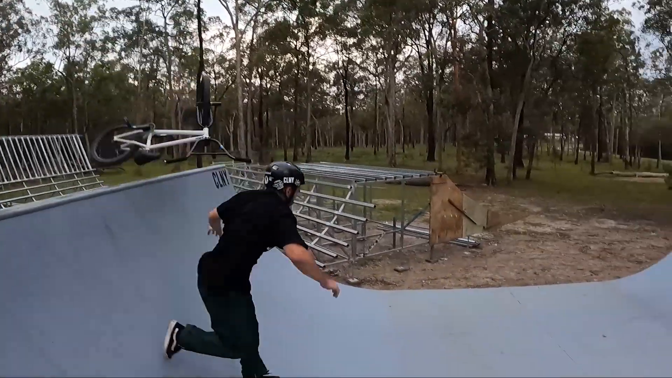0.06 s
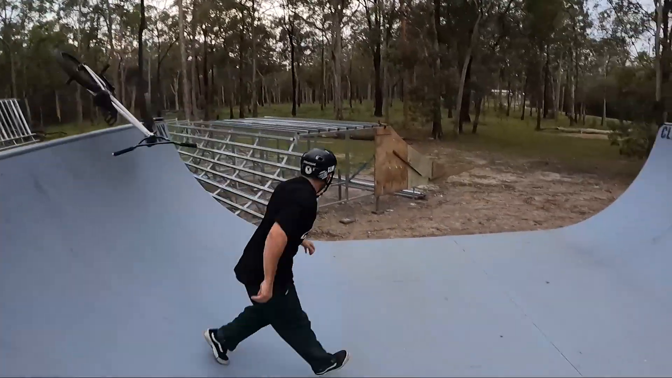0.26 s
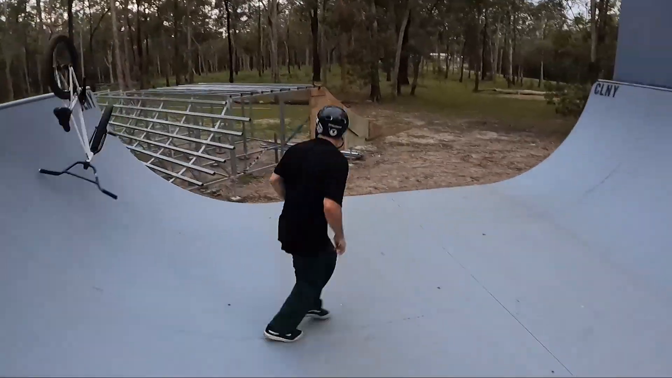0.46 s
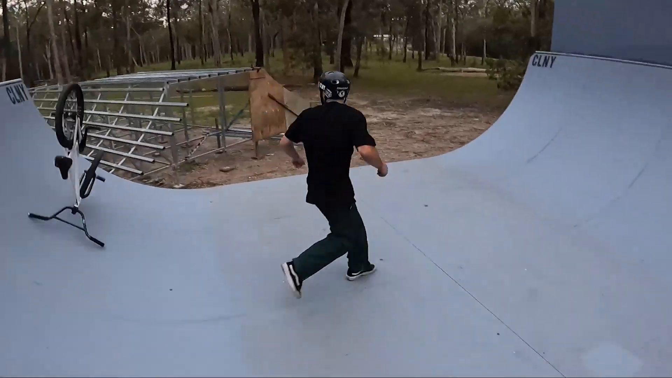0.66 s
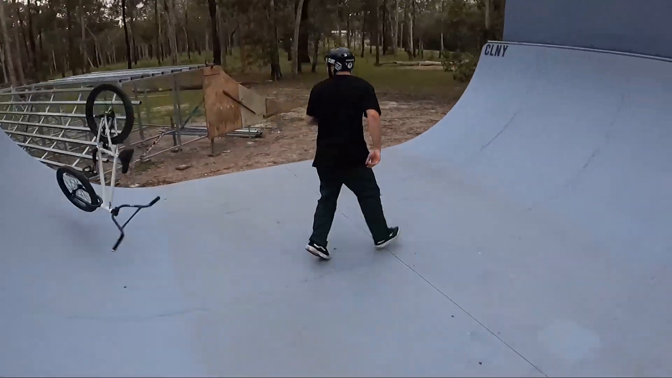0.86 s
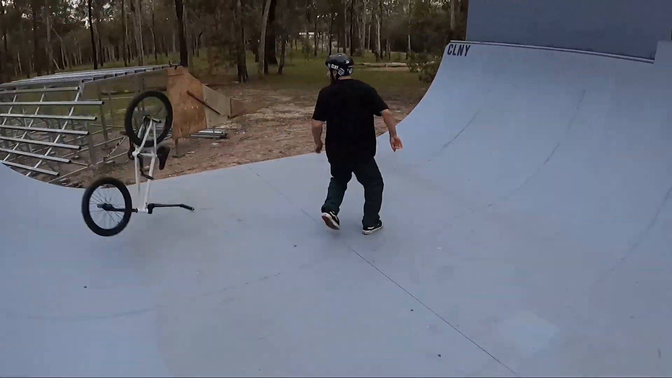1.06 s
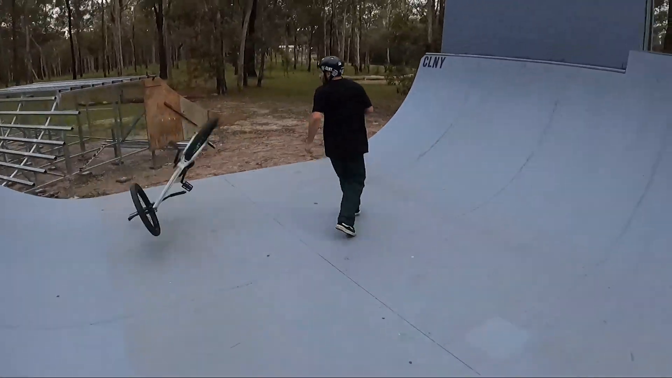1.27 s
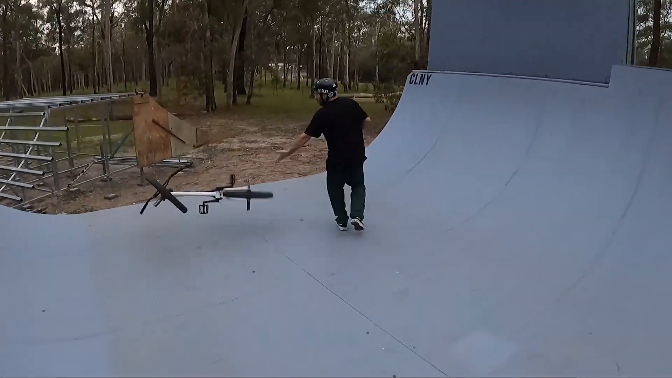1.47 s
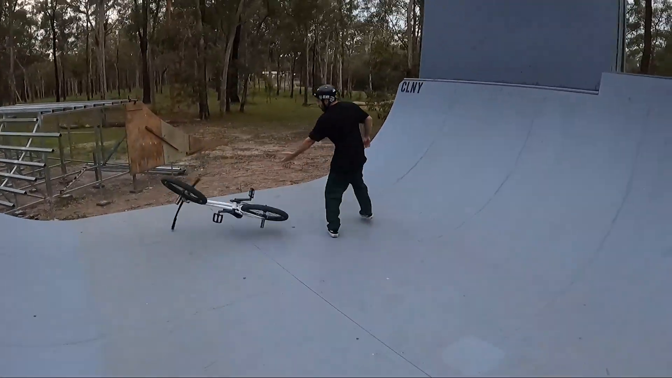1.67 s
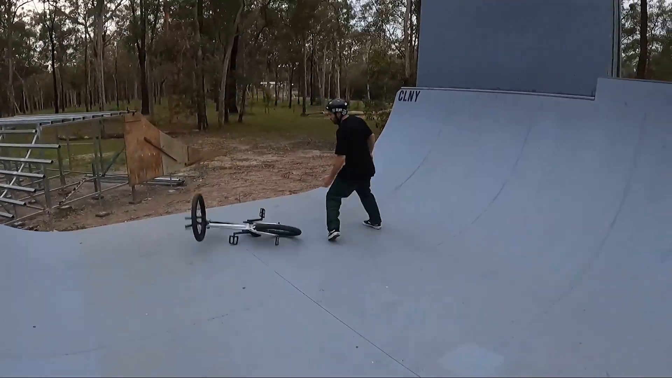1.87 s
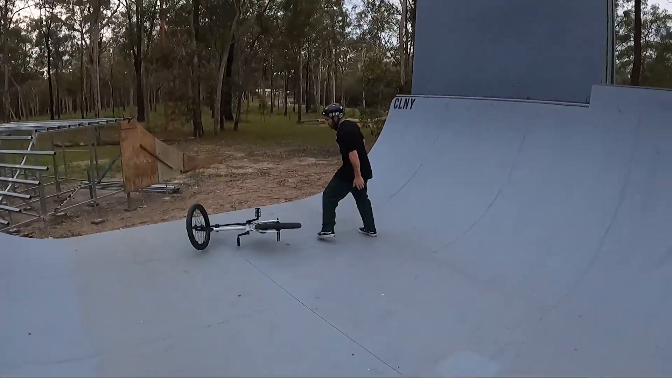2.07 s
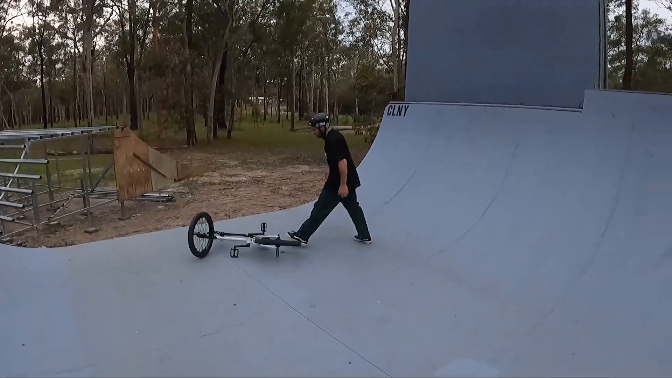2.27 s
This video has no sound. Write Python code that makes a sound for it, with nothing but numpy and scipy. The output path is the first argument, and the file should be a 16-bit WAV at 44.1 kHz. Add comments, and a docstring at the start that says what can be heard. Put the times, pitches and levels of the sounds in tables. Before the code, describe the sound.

Close, nearly mono outdoor pickup of a bike tumbling on a hollow ramp: first thuds, a brief shoe squeak, clustered cracks and booms, gritty scraping, then fading clatter, with soft air hiss and insect whine.

```python
"""A riderless bike tumbles down a hollow wooden ramp while its rider's shoes slap and squeak on the deck.
Throughout, cicadas whine in the trees, air hisses and low rumble shakes the microphone under a scraping slide.
A faint squeak leads into the first blows: noise bursts crack, echo off the facing slope and boom in the panels.
From half way the steel frame rings faintly, sine pips whistle softly, and the last blows grow weaker."""
import sys
import numpy as np
from scipy import signal
from scipy.fft import rfft, irfft
from scipy.io import wavfile
from scipy.ndimage import uniform_filter1d

SR = 44100
rng = np.random.default_rng(int(sys.argv[2]) if len(sys.argv) > 2 else 0)


def store_pcm(level_fs):
    """Save levels as 16-bit WAV."""
    pcm = np.round(np.clip(level_fs, -1, 1) * 32767).astype(np.int16)
    wavfile.write(sys.argv[1], SR, np.atleast_2d(pcm).T)


N = 101430  # samples, 2.3 s

# Blows of bike and shoes on the ramp, and some of their echoes off the facing slope.
# Each row: start in seconds, levels of knock, thump, boom and snap in dB,
# snap pitch, boom centre and thump centre in Hz, crack length in seconds, knock tilt in dB per octave,
# rattle in dB relative to the crack.
BLOWS = [(0.062, -39.5, -47, -46, -42, 6700, 285, 138, 0.0031, -1.5, -6),
         (0.189, -35.5, -21, -25.5, -48, 7100, 288, 88, 0.0019, -9, -3),
         (0.214, -13.5, -9, -4.5, -30, 4700, 272.3, 174, 0.0036, -0.6, -22),
         (0.244, -65, -20, -52, -41, 6820, 245, 98, 0.0041, -0.3, -11),
         (0.42, -27.5, -20.5, -29, -45, 7500, 296, 224, 0.0022, -15, -27),
         (0.447, -24, -17.5, -38, -48, 4630, 242, 78.6, 0.0021, -1.3, -6.5),
         (0.452, -34, -40, -27.5, -27.5, 5700, 321, 88.8, 0.0044, 7, -8),
         (0.592, -16, -22, -14, -22, 5040, 328, 157, 0.0031, -0.1, -12),
         (0.641, -7, -17, -3.5, -9.5, 6500, 334, 207, 0.0037, 1.5, -13.5),
         (0.664, -8.5, -14.5, -32, -5, 7300, 360, 133, 0.0038, 0.4, -8.5),
         (0.671, -16.5, -22, -30, -8.5, 6900, 365, 126, 0.0038, 1, -11.5),
         (0.707, -19.5, -14.5, -13, -13.5, 7640, 315, 80.7, 0.0047, 1.3, -20),
         (0.713, -19, -19, -35, -18.5, 6950, 350, 134, 0.0056, -0.3, -7),
         (0.743, -27, -42, -55, -48, 4570, 358, 221, 0.0059, -4, -15),
         (0.794, -18.5, -19.5, -26, -8, 7040, 425, 162, 0.0034, -0.2, 2),
         (0.799, -14.5, -20, -7, -19.5, 7300, 342, 221, 0.0041, 0.6, -3.5),
         (0.819, -28, -23, -15, -31, 6950, 348, 224, 0.005, -1.2, 2.5),
         (0.835, -25, -32, -44, -20, 6920, 360, 134, 0.0053, -1.5, 2),
         (0.843, -25, -23, -19.5, -21, 6620, 336, 80.4, 0.0035, 0, -4),
         (0.869, -28, -26, -20.5, -34, 6700, 287, 132, 0.0032, 0, -11),
         (1.057, -14, -16.5, -13, -12.5, 6200, 308, 169, 0.0015, -2.9, -3.5),
         (1.096, -25.5, -20.5, -49, -30, 3760, 307, 176, 0.0043, -3, -24),
         (1.208, -9.5, -16.5, -13, -29, 4370, 358, 206, 0.0046, 1.85, -5),
         (1.259, -10.5, -12.5, -9.5, -6.5, 5850, 380, 163, 0.0044, -1.7, -9),
         (1.291, -4, -12, -7.5, 0.5, 6040, 387, 167.5, 0.0026, 1, -9.5),
         (1.335, -19.5, -23, -30, -38, 7260, 433, 154, 0.0072, 1.5, -2),
         (1.349, -16, -17.5, -17.5, -43, 3800, 282, 178, 0.004, 0, -11),
         (1.658, -18.5, -17.5, -1, -6.5, 6360, 392, 229, 0.0056, -6, -20.5),
         (1.663, -4.5, -7.5, -37, -37, 4870, 380, 152, 0.005, -3.1, -13),
         (1.762, -12, -21, -14.5, -39, 3440, 387, 227, 0.0028, -2.83, -9.5),
         (1.767, -20.5, -23, -22, -27, 5330, 286, 82, 0.0057, -6.5, -23),
         (1.779, -18, -14.5, -19.5, -41, 3570, 279, 84, 0.0027, -6.7, -11),
         (1.969, -8.5, -21, -18, -10.5, 4500, 366, 83.4, 0.0019, -1.3, -8.5),
         (1.982, -15.5, -15, -32, -15.5, 5400, 246, 163, 0.0035, -2.4, -3),
         (1.993, -15, -23, -15.5, -11, 5200, 307, 219, 0.0018, -2.8, -8),
         (1.999, -14, -16.5, -46, -48, 5360, 313, 94, 0.0063, 0, -10),
         (2.183, -25.5, -50, -27, -17.5, 5500, 368, 81.6, 0.0039, -0.3, -9.5),
         (2.191, -32, -31, -26.5, -40, 5260, 358, 155, 0.0035, 0.3, 1.5),
         (2.241, -32.5, -32, -33, -31, 3860, 370, 95, 0.0014, -1.5, -2.5),
         (2.253, -22, -25, -53, -23, 4640, 435, 197, 0.0029, -2, -4.5),
         (2.264, -35.5, -42, -31, -46, 4840, 248, 180, 0.0031, 0.2, 2)]


def amp(db):
    """Turns dB into gain."""
    return 10 ** (np.asarray(db) / 20)


def evened(x):
    """Scales a sound to unit RMS."""
    return x / np.sqrt(np.mean(x ** 2) + 1e-20)


def steadied(x):
    """Low noise with its gusts held back against its lulls, which leaves it a few dB below unit RMS."""
    unit = evened(x)
    return unit / np.sqrt(uniform_filter1d(unit ** 2, size=3000) + 0.94)


def curve(points, count=1):
    """A level curve, from the dB in column count, as gain for every sample."""
    s, db = np.transpose(points)[[0, count]]
    return amp(np.interp(np.arange(N) / SR, s, db))


def colour(x, points):
    """Filters by a spectrum given as (Hz, dB), joined along a log frequency axis."""
    f, db = np.transpose(points)
    hz = np.fft.rfftfreq(len(x), 1 / SR)
    gain = amp(np.interp(np.log(hz + 1), np.log(f + 1), db))
    return irfft(rfft(x) * gain, len(x))


def add(mix, s, sound):
    """Lays a sound into the mix at s seconds, cut off at the end."""
    part = mix[round(s * SR):][:len(sound)]
    part += sound[:len(part)]


def band(x, hz, width_hz):
    """A two-pole resonance."""
    r = np.exp(-np.pi * width_hz / SR)
    return signal.lfilter([1, 0, -1], [1, -2 * r * np.cos(2 * np.pi * hz / SR), r * r], x)


def nearness(modes, hz, reach_oct):
    """Level in dB by which each mode is driven: 6 dB down at reach_oct octaves from hz."""
    return -6 * (np.log2(np.array(modes)[:, :1] / hz) / reach_oct) ** 2


def ring(modes, extra_db, phases, t, rise_s):
    """Dying modes that swell in over rise_s, scaled by their summed starting power."""
    hz, db, t60 = np.transpose(modes)[:, :, None]
    tones = amp(db + extra_db - 60 * t / t60) * np.sin(2 * np.pi * (hz * t + phases))
    swell = 1 - np.exp(-t / rise_s)
    return tones.sum(0) * swell / np.sqrt(np.sum(amp(2 * (db + extra_db))) / 2)


def air(noise):
    """Steady hiss of the open air: coloured noise."""
    # Spectrum of the air. Each row: frequency in Hz, level in dB per Hz.
    air_colour = [(90, -10), (150, 10), (800, 0), (1500, 1.5), (5000, -6), (9000, -9), (14800, -21),
                  (16300, -18)]
    return amp(-59.5) * evened(colour(noise, air_colour))


def cicadas(noise, drift):
    """Cicadas in the trees: a narrow noise band pulsing at an unsteady rate."""
    # Loudness of the cicadas. Each row: time in seconds, level in dB.
    cicada_level = [(0, -54.5), (.6, -55), (1.2, -57), (1.9, -57), (2.3, -58)]
    pitch_hz, width_hz, mean_pulses_hz = 6950, 1300, 160  # width of each of two passes
    pulse_hz = mean_pulses_hz * (1 + 0.6 * evened(uniform_filter1d(drift, size=900)))
    pulses = 1 + 0.5 * np.sin(2 * np.pi * np.cumsum(pulse_hz) / SR)
    whine = band(band(noise, pitch_hz, width_hz), pitch_hz, width_hz)
    return curve(cicada_level) * evened(pulses * whine)


def rumble_and_drone(rumble_noise, drone_noise):
    """Low rumble shaking the microphone and a drone of the deck: two dark noises that swell and sink."""
    # Loudness before steadying. Each row: time in seconds, rumble in dB, deck drone in dB.
    low_level = [(0.0, -32.5, -33), (0.13, -24.5, -45), (0.17, -28.5, -42), (0.28, -24, -30.5),
                 (0.36, -40, -24), (0.52, -25.5, -39.5), (0.58, -31, -33.5), (0.74, -59.5, -32),
                 (0.81, -36, -46), (0.86, -23.5, -40), (1.05, -32, -36), (1.25, -29, -38), (1.29, -20, -52),
                 (1.4, -25, -39), (1.43, -25, -36.5), (1.63, -33.5, -49), (1.67, -18, -63),
                 (1.78, -16.5, -32), (1.8, -39, -25), (1.94, -29.5, -41), (2.0, -27, -24.5),
                 (2.3, -37, -37)]
    # Spectrum of the rumble. Each row: frequency in Hz, level in dB per Hz.
    rumble_colour = [(10, -4.5), (28, 6.5), (60, -9), (90, -16.5), (200, -46), (500, -86), (2000, -90)]
    # Spectrum of the deck drone. Each row: frequency in Hz, level in dB per Hz.
    drone_colour = [(30, -29), (70, 7.5), (110, 2.5), (200, -5.5), (330, -18), (500, -22), (2000, -72)]
    rumble = curve(low_level) * steadied(colour(rumble_noise, rumble_colour))
    drone = curve(low_level, count=2) * steadied(colour(drone_noise, drone_colour))
    return rumble + drone


def pips():
    """A faint whistle, perhaps a far bird: short soft sine notes."""
    # Notes of the whistle. Each row: start in seconds, length in seconds, level in dB, pitch in Hz.
    notes = [(1.45, .032, -51, 2121), (1.488, .03, -52, 2121), (1.525, .035, -50, 2121),
             (1.568, .042, -50, 2121), (1.628, .03, -52, 2121)]
    out = np.zeros(N)
    for s, length, db, hz in notes:
        t = np.arange(0, length, 1 / SR)
        swell = np.sqrt(abs(np.sin(np.pi * t / length)))
        add(out, s, amp(db) * swell * np.sin(2 * np.pi * hz * t))
    return out


def slide(scrape_noise, fizz_noise, roughness):
    """Gritty sliding of the bike: roughened noise as a scrape, with a treble fizz on top."""
    # Loudness of the slide. Each row: time in seconds, scrape in dB, treble fizz in dB.
    slide_level = [(0.0, -54, -65), (0.27, -79, -62), (0.5, -48.5, -65), (0.63, -54, -58), (0.77, -43, -69),
                   (1.04, -50, -55), (1.16, -51.5, -63), (1.27, -49, -48), (1.34, -37, -45.5),
                   (1.48, -44.5, -66), (1.71, -55, -59), (1.85, -53.5, -54), (2.06, -43, -61),
                   (2.2, -53.5, -65), (2.3, -48, -67)]
    # Spectrum of the sliding. Each row: frequency in Hz, level in dB per Hz.
    slide_colour = [(180, -25), (300, 1), (538, -8), (626, -6), (1120, -13), (1280, -10.5), (1760, -12.5),
                    (4570, -14), (13300, -28.5), (16300, -29)]
    fizz_hz, fizz_width_hz = 13900, 4100
    grit = amp(1.8 * evened(uniform_filter1d(roughness, size=200)))
    scrape = evened(colour(scrape_noise * grit, slide_colour))
    fizz = evened(band(colour(fizz_noise * grit, slide_colour), fizz_hz, fizz_width_hz))
    return curve(slide_level) * scrape + curve(slide_level, count=2) * fizz


def squeaks():
    """Rubber stick-slip of the shoes: a short rising whistle with its octave."""
    # Shoe squeaks. Each row: start in seconds, length in seconds, level in dB, starting pitch in Hz.
    squeak_rows = [(0.026, 0.025, -53, 5000), (0.457, 0.0049, -19, 5050), (0.4684, 0.0062, -28, 5120)]
    glide, octave_db = 0.13, -8.5  # glide: fraction the pitch rises by
    out = np.zeros(N)
    for s, length, db, hz in squeak_rows:
        u = np.arange(0, length, 1 / SR) / length
        turn = 2 * np.pi * np.cumsum(hz * (1 + glide * u)) / SR
        swell = np.sin(np.pi * u ** 0.31)  # peaks early
        add(out, s, amp(db) * swell * (np.sin(turn) + amp(octave_db) * np.sin(2 * turn)))
    return out


def frame():
    """Thin steel tones of the bike frame, their level blurred by loose parts buzzing along."""
    # Modes of the steel frame. Each row: frequency in Hz, level in dB, time to fall 60 dB in seconds.
    steel_modes = [(2121, -6, .6), (4506, -4, .9), (4900, 2, .3), (610, -3, .8), (790, 0, .12)]
    # Strikes on the frame. Each row: start in seconds, level in dB, centre of the driven modes in Hz.
    strikes = [(1.21, -23, 840), (1.293, -43, 2600), (1.66, -39.5, 5340), (1.763, -50, 4400)]
    reach_oct, wobble = 0.26, 0.52  # wobble: RMS fraction of the level
    out, t = np.zeros(N), np.arange(SR) / SR
    for s, db, hz in strikes:
        near_db = nearness(steel_modes, hz, reach_oct)
        throb = 1 + wobble * evened(uniform_filter1d(rng.standard_normal(SR), size=150))
        phases = rng.random((len(steel_modes), 1))
        add(out, s, amp(db) * throb * ring(steel_modes, near_db, phases, t, 0.003))
    return out


def panels():
    """Each row of BLOWS booms in the hollow ramp, most in the panels tuned near the row's own centres."""
    # Low modes of the ramp panels. Each row: frequency in Hz, level in dB, time to fall 60 dB in seconds.
    thump_modes = [(59.4, 5.5, 0.12), (76.8, -11.5, 0.37), (93.4, -2, 0.17), (124.1, -0.5, 0.19),
                   (150.1, -10, 0.31), (166, -5, 0.21), (197.5, 2, 0.1), (214.6, -2, .2)]
    # Higher modes of the ramp panels. Each row: frequency in Hz, level in dB, time to fall 60 dB in seconds.
    boom_modes = [(255, 0.5, .16), (293.2, 5.5, 0.088), (310.4, 0, 0.18), (320.3, 3, 0.19),
                  (346.9, 5, 0.26), (385, 16.5, 0.05), (486, -20, 0.063), (509, 12.5, 0.16)]
    thump_reach_oct, boom_reach_oct, rise_s = 0.39, 0.15, 0.005
    phase_scatter = 0.56  # turns: the modes start within about half a cycle of each other
    out, t = np.zeros(N), np.arange(16384) / SR
    for s, _, thump_db, boom_db, _, _, boom_hz, thump_hz, *_ in BLOWS:
        for modes, db, hz, reach_oct in ((thump_modes, thump_db, thump_hz, thump_reach_oct),
                                         (boom_modes, boom_db, boom_hz, boom_reach_oct)):
            near_db = nearness(modes, hz, reach_oct)
            phases = phase_scatter * rng.random((len(modes), 1))
            add(out, s, amp(db) * ring(modes, near_db, phases, t, rise_s))
    return out


def cracks():
    """Each blow or echo: a noise burst of wooden knock and bright snap, a gritty rattle, and a dull tail."""
    # Spectrum of the wooden knock. Each row: frequency in Hz, level in dB per Hz.
    knock_colour = [(240, -12.5), (400, -0.5), (570, 2.5), (801, 0), (2180, -5), (3580, -9), (4310, -8.5),
                    (9180, -17.5), (16000, -33.5)]
    grit_db, rattle_t60 = 2, 0.074
    tail_db, tail_t60, tail_hz, tail_width_hz = -9.5, 0.18, 1670, 2250  # tail_db: relative to the rattle
    snap_width_hz, snap_rise_s, snap_rattle_db = 2120, 0.0025, -8.5  # width of each of two passes
    out, t = np.zeros(N), np.arange(8192) / SR
    for s, knock_db, _, _, snap_db, snap_hz, _, _, length, tilt, rattle_db in BLOWS:
        a, b, c = rng.standard_normal((3, len(t)))
        burst = np.exp(-(t / length) ** 2)
        grit = grit_db * evened(uniform_filter1d(c, size=40))
        rattle = amp(rattle_db - 60 * t / rattle_t60 + grit) * (1 - burst)
        tilted = [(f, db + tilt * np.log2(f / 1400)) for f, db in knock_colour]
        knock = evened(colour(a, tilted)) * (burst + rattle)
        dull = evened(band(colour(c, knock_colour), tail_hz, tail_width_hz))
        dull = dull * amp(rattle_db + tail_db - 60 * t / tail_t60)
        snap = evened(band(band(b, snap_hz, snap_width_hz), snap_hz, snap_width_hz))
        snap = snap * (burst + amp(snap_rattle_db) * rattle) * np.minimum(t / snap_rise_s, 1)
        onset = np.minimum(t / 0.00043, 1)
        add(out, s, amp(knock_db) * (knock + dull) * onset + amp(snap_db) * snap)
    return out


def spread(x):
    """Bending waves in the deck carry the treble fastest: delay falls as one over the root of frequency."""
    lag_s = 0.00187  # delay is lag_s * (sqrt(1000 / hz) - 1/2): none at 4 kHz
    hz = np.fft.rfftfreq(len(x), 1 / SR)
    turn = np.exp(-4j * np.pi * lag_s * (np.sqrt(1000 * hz) - hz / 4))
    return irfft(rfft(x) * turn, len(x))


def yard(x):
    """Slaps off the facing slope and a faint tail of decaying noise from the trees."""
    # Echoes off the facing slope. Each row: delay in seconds, level in dB.
    slope_echoes = [(.0045, -18), (.013, -23.5)]
    tail_db, tail_t60 = -20, 0.44  # tail_db: total energy relative to the direct sound
    t = np.arange(SR // 2) / SR
    tail = rng.standard_normal(len(t)) * amp(-60 * t / tail_t60) * np.minimum(t / 0.0067, 1)
    taps = amp(tail_db) * tail / np.linalg.norm(tail)
    taps[0] = 1  # direct sound
    for s, db in slope_echoes:
        taps[round(s * SR)] += amp(db)
    return signal.fftconvolve(x, taps)[:N]


def scene():
    """Mixes blows, bike and background, then widens to stereo with a delayed, coloured copy of the middle."""
    # Stereo width. Each row: frequency in Hz, level of the side relative to the middle in dB.
    side_level = [(60, -50), (180, -59.5), (550, -44), (1650, -40), (4970, -37), (15000, -18.5)]
    blows = yard(spread(cracks()) + squeaks()) + panels()
    mid = blows + frame() + pips()
    scrape, rumble, hiss, whine, roughness, drift, drone, fizz = rng.standard_normal((8, N))
    mid = mid + slide(scrape, fizz, roughness) + rumble_and_drone(rumble, drone)
    mid = mid + air(hiss) + cicadas(whine, drift)
    side = colour(np.pad(mid, (37, 0))[:N], side_level)  # delay in samples
    return np.array([mid + side, mid - side])


def record(dry):
    """The loudest peaks flatten at the ceiling; then a steep low-pass limits the band."""
    ceiling, edge_hz = 1.0, 16250
    clipped = np.clip(dry, -ceiling, ceiling)
    lowpass = signal.firwin(767, edge_hz, window=("kaiser", 12), fs=SR)
    return signal.oaconvolve(clipped, lowpass[None], "same")


dry = scene()
out = record(dry)
store_pcm(out)
```